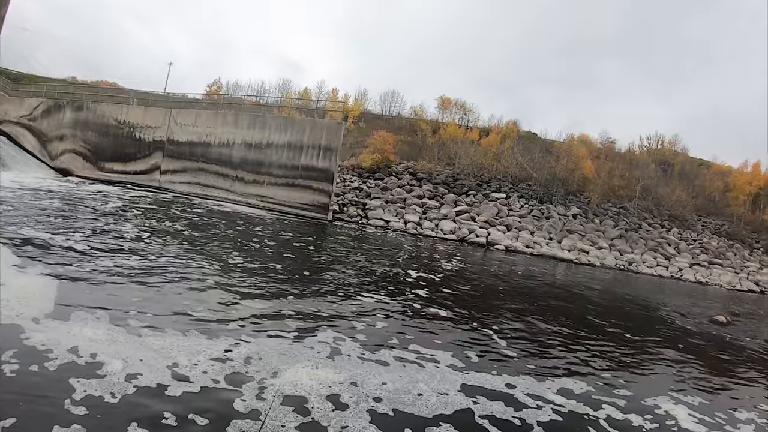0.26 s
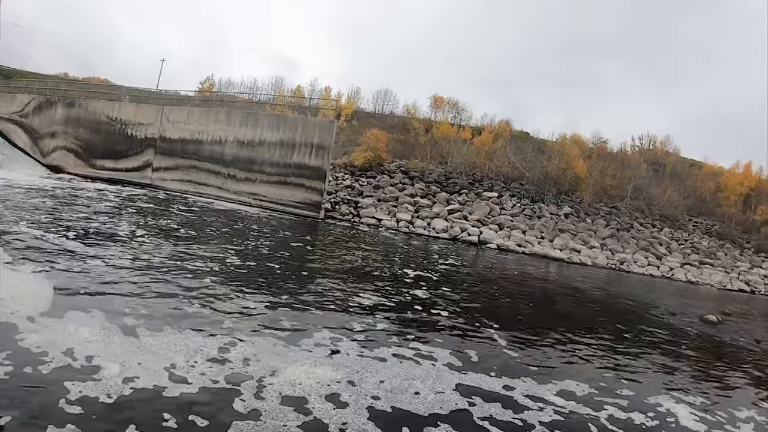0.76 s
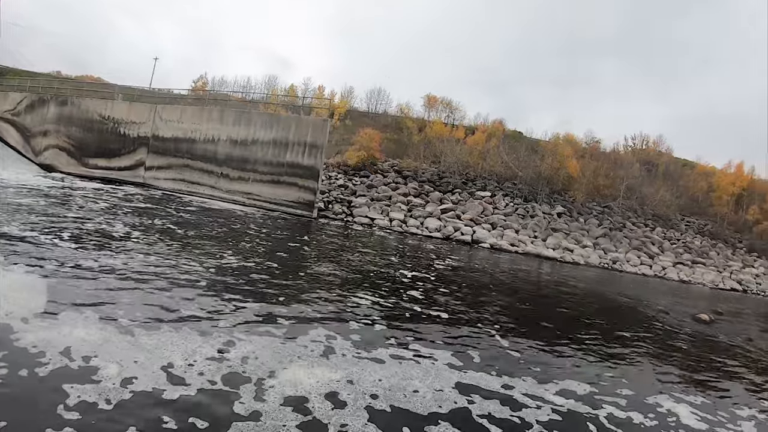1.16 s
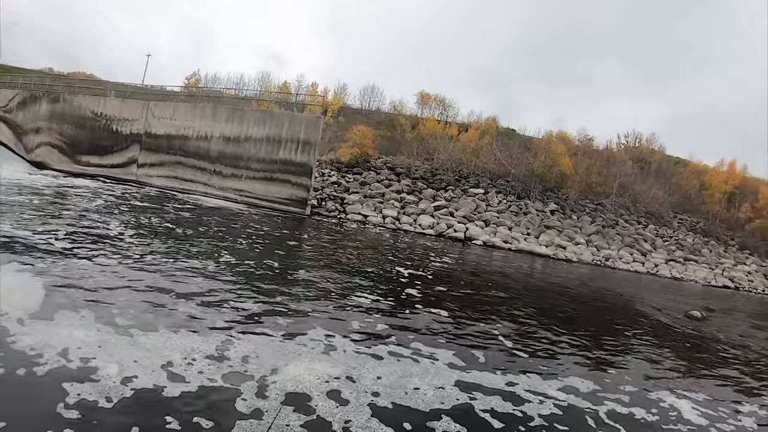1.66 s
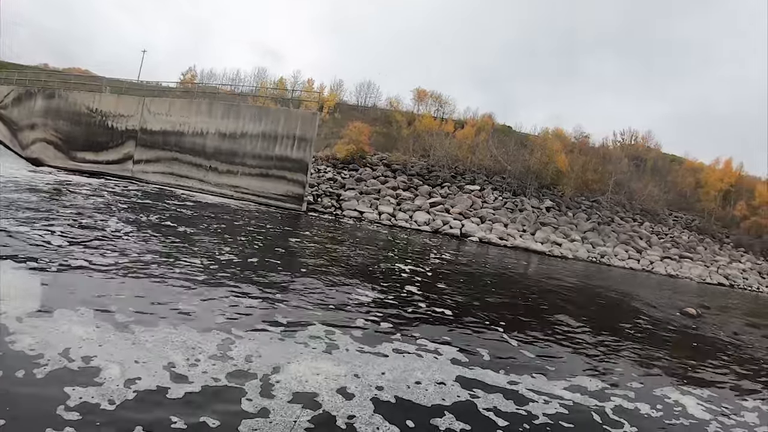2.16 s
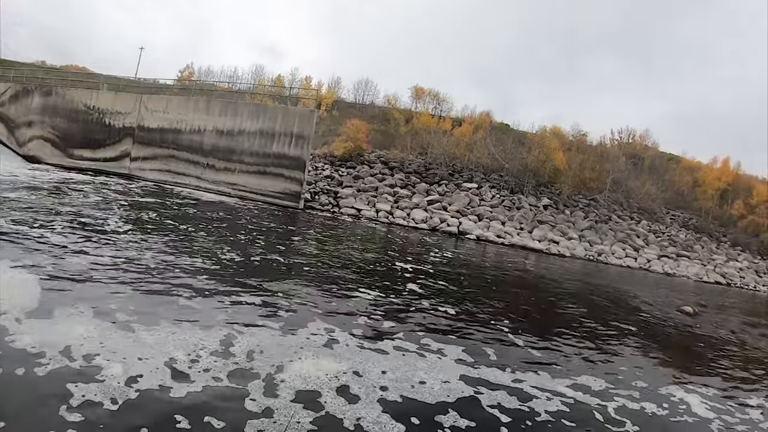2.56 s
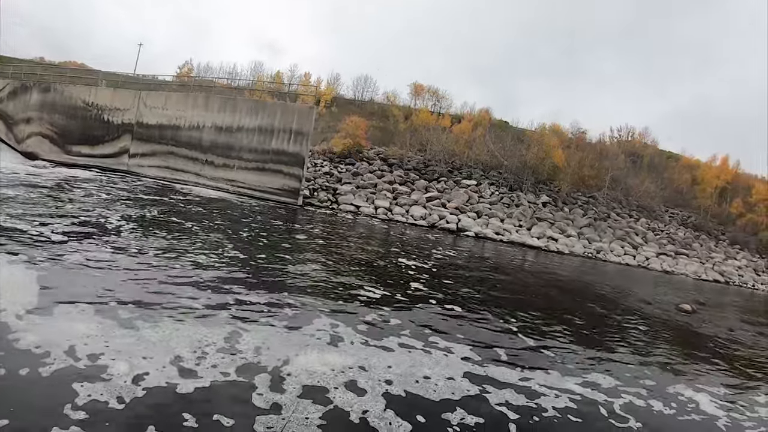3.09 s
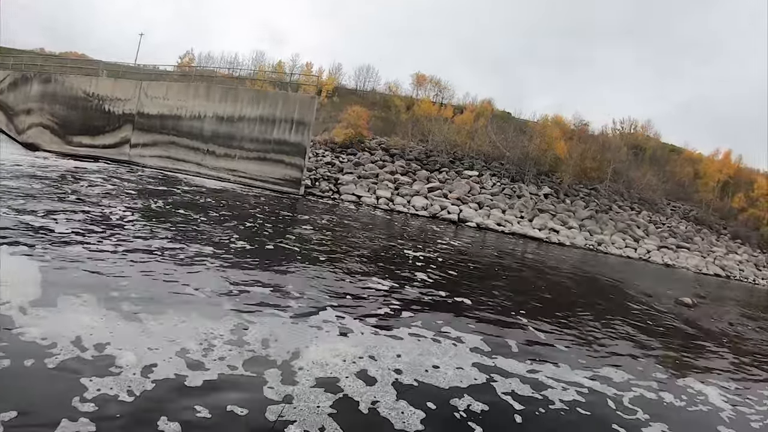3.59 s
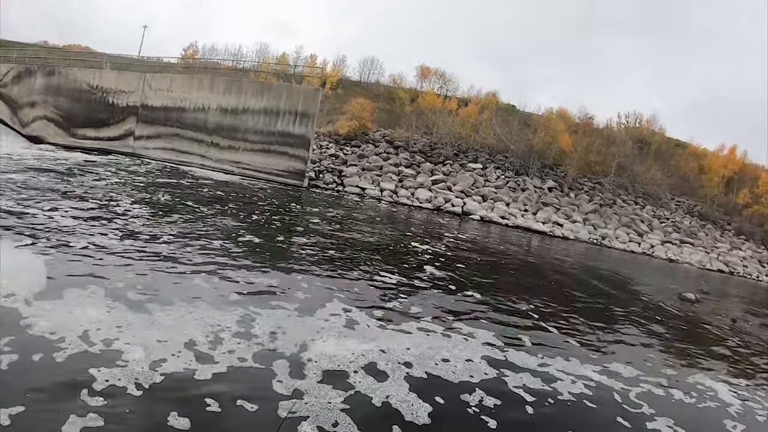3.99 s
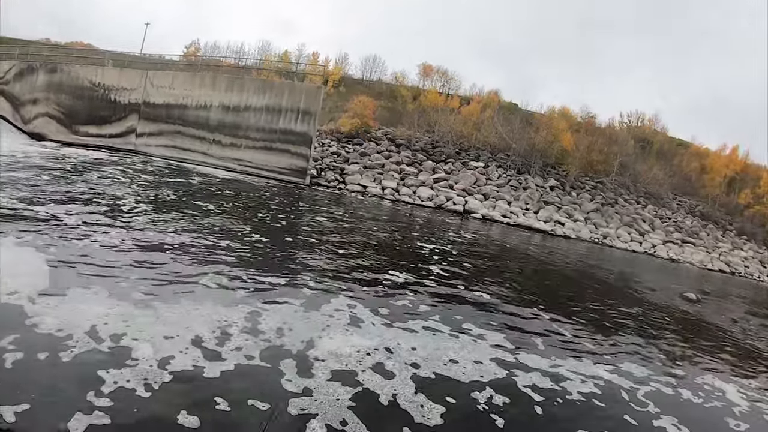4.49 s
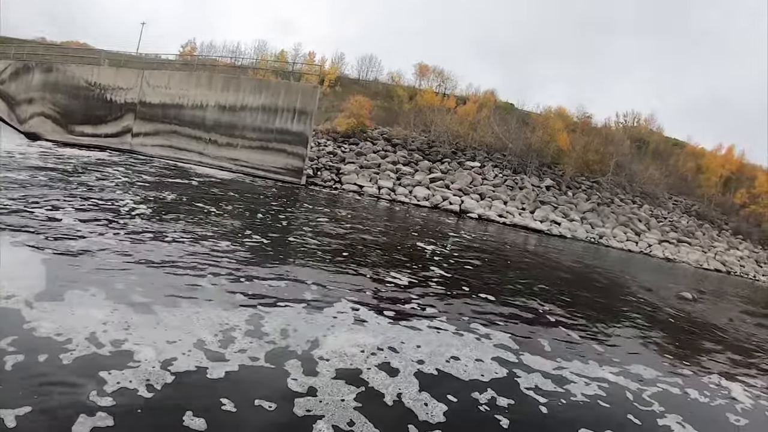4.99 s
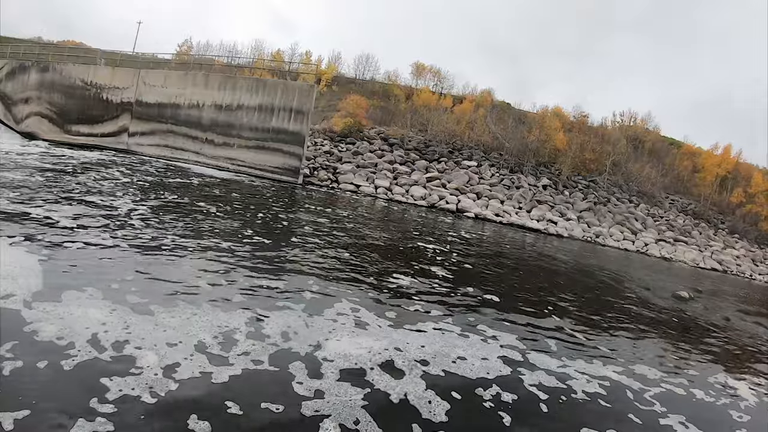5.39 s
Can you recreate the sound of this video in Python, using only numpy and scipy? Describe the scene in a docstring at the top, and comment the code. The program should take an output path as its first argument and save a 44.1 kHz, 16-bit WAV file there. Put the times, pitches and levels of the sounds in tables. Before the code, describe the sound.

Lumpy low wind rumble and flapping dominate outdoors, while smooth distant falling water hisses constantly behind, with a couple of tiny close plops.

```python
"""A wide pool below a concrete spillway, where wind blows unevenly over a small microphone in a closed housing.
The far fall is a smooth rush of shaped noise. Wind eddies of seven sizes, each a narrow band of noise,
range from rumble and thuds to flutter and rustle. Foam bubbles burst as faint, very short rings,
and four drops plop close by as short tones with rising pitch."""
import sys
import numpy as np
from scipy import signal
from scipy.fft import rfft, irfft, next_fast_len
from scipy.io import wavfile
from scipy.ndimage import uniform_filter1d, minimum_filter1d

SR = 44100
rng = np.random.default_rng(int(sys.argv[2]) if len(sys.argv) > 2 else 0)


def inscribe(sig):
    """Save sig as 16-bit PCM at rate SR to the path in sys.argv[1].

    A 1-D sig is mono; a 2-D sig holds one channel per row.
    Samples are clipped to [-1, 1] before scaling.
    """
    pcm = np.round(np.clip(np.atleast_2d(sig).T, -1, 1) * 32767)
    wavfile.write(sys.argv[1], SR, pcm.astype(np.int16))


N = 249165

# level and brightness of the fall's rush over time: start_s, rush_level_db, brightness_db_per_octave
FALL_OVER_TIME = [(0, -44, 0), (.35, -43, -0.5), (.48, -42.5, -0.5), (.65, -43, -0.7), (1.3, -43, -0.5),
                  (1.55, -44, 0), (2.2, -43.5, -0.1), (2.6, -45, 0), (2.8, -44.5, -0.3), (2.92, -45.5, 0.1),
                  (3.1, -45, 0), (3.4, -43.5, -0.4), (3.8, -43, 0.1), (4.05, -44, -0.4), (4.3, -43, 0.1),
                  (4.6, -43, -0.5), (5.05, -43, -0.3), (5.65, -43.5, -0.3)]
# colour of the rush: frequency_hz, relative_level_db (per Hz)
RUSH_COLOUR = [(300, -12.5), (450, -9.5), (700, -3.5), (1000, -8.5), (1300, -11.5), (1750, -11.5),
               (2200, -14), (3200, -19), (3600, -30), (4800, -31.5), (5300, -38.5), (7300, -39),
               (8800, -48.5), (9600, -51.5), (10500, -59)]
FALL_WAVER_DB, FALL_WAVER_RATE_HZ = .55, 6

# uneven level of the big slow eddies from moment to moment, before random lumps and puffs:
# start_s, rumble_db, thud_db, buffet_db
BIG_EDDY_LEVELS = [(0.0, -30.5, -41, -34), (0.09, -26.5, -33, -36.5), (0.12, -36.5, -34.5, -31),
                   (0.56, -31, -31, -27.5), (0.61, -41, -40, -25.5), (0.65, -25, -27, -26.5),
                   (0.76, -46, -23.5, -32), (0.83, -28, -45, -30.5), (0.92, -22.5, -32, -28.5),
                   (0.97, -24, -47, -29.5), (1.01, -32, -22, -24), (1.06, -34, -34, -36),
                   (1.18, -37, -30.5, -29.5), (1.23, -31, -30, -29), (1.4, -35, -34, -31),
                   (1.55, -35, -36, -34.5), (1.75, -36, -30.5, -33), (1.95, -37, -31, -34.5),
                   (2.03, -33, -33, -24), (2.07, -37, -27, -26), (2.21, -41, -37, -38),
                   (2.24, -29.5, -30, -32), (2.33, -31, -25, -26.5), (2.42, -31, -35, -32.5),
                   (2.51, -33, -32, -25), (2.56, -24.5, -37, -24), (2.7, -35, -27, -28),
                   (2.78, -27, -25, -22), (2.89, -34, -23, -23), (2.98, -33, -33.5, -30),
                   (3.01, -34.5, -30, -34), (3.15, -29, -34.5, -32), (3.27, -43, -31, -29.5),
                   (3.39, -31, -28, -28), (3.47, -41, -35, -36), (3.51, -31, -27, -26),
                   (3.57, -30, -31, -31), (3.67, -31, -22, -28), (3.77, -34, -28.5, -32),
                   (3.82, -25, -17.5, -26), (3.87, -30, -34, -30.5), (3.92, -33, -32, -19.5),
                   (3.96, -36, -44, -30), (4.04, -44, -35, -38), (4.07, -38, -44, -30.5),
                   (4.18, -38, -23, -25), (4.28, -39, -28, -28.5), (4.41, -33.5, -33, -29),
                   (4.54, -31, -25, -27), (4.68, -42, -31, -29.5), (4.8, -38, -32, -27.5),
                   (4.87, -32, -25, -31.5), (5.02, -29, -23, -33), (5.08, -35, -32.5, -30.5),
                   (5.26, -26.5, -20.5, -36), (5.3, -43, -38, -30), (5.44, -40, -37, -32.5),
                   (5.55, -32, -20.5, -39), (5.6, -31, -35, -26)]
# uneven level of the small fast eddies at the port, before random lumps and puffs:
# start_s, flap_db, flutter_db, rustle_db, whisk_db
SMALL_EDDY_LEVELS = [(0.0, -34.5, -26.5, -30, -38), (0.13, -31, -26.5, -34, -41),
                     (0.25, -32.5, -29.5, -34, -41), (0.44, -33.5, -29, -34, -41),
                     (0.52, -42, -32, -38, -32), (0.6, -28, -32, -38, -51), (0.64, -32, -40, -38.5, -46),
                     (0.69, -37, -35, -40, -50), (0.85, -35.5, -34, -38, -51),
                     (1.02, -32.5, -39, -38.5, -41.5), (1.26, -36.5, -31, -29, -44),
                     (1.3, -27.5, -31.5, -30, -41.5), (1.51, -28.5, -23.5, -32.5, -40.5),
                     (1.56, -20.5, -33.5, -38.5, -39.5), (1.67, -32.5, -27.5, -28, -39.5),
                     (1.74, -36, -26, -40.5, -39), (1.79, -27.5, -28.5, -34, -39.5),
                     (1.95, -27.5, -27, -31.5, -41), (2.12, -27.5, -26, -33, -42),
                     (2.16, -19.5, -28.5, -37, -41), (2.34, -37, -24, -31, -40.5),
                     (2.41, -26.5, -39, -29.5, -42.5), (2.67, -29.5, -28.5, -38, -41),
                     (2.69, -24, -30, -31, -35.5), (3.05, -33.5, -35.5, -41, -46.5),
                     (3.3, -33, -35.5, -38.5, -48.5), (3.47, -28, -36.5, -36, -43),
                     (3.51, -25.5, -24.5, -33, -41.5), (3.63, -28.5, -31.5, -40, -42.5),
                     (3.89, -26.5, -31, -33.5, -39.5), (3.98, -31.5, -36.5, -40.5, -49),
                     (4.19, -31, -34, -34, -41.5), (4.44, -28, -35, -43.5, -47),
                     (4.53, -44.5, -34, -36, -46), (4.66, -27, -29, -35, -41.5),
                     (4.77, -38, -26.5, -33.5, -40.5), (4.85, -27.5, -29, -35.5, -39.5),
                     (5.0, -23, -25.5, -29.5, -39.5), (5.1, -28.5, -26.5, -32.5, -39.5),
                     (5.25, -29, -27, -35.5, -43.5), (5.35, -29, -28, -31, -40), (5.45, -24, -31, -34, -43),
                     (5.62, -22.5, -26, -30.5, -42), (5.65, -20, -22, -28, -40)]
# colour of each eddy size, largest first: frequency_hz, relative_level_db (per Hz)
RUMBLE_COLOUR = [(8, -22), (15, -9), (25, -2.5), (34, -1), (42, -18)]
THUD_COLOUR = [(28, -18), (35, -2), (43, -1), (56, -3.5), (68, -18)]
BUFFET_COLOUR = [(52, -18), (63, -1), (80, -3), (108, -4.5), (135, -18)]
FLAP_COLOUR = [(80, -32), (115, -5), (155, 0.5), (195, -6.5), (260, -33.5)]
FLUTTER_COLOUR = [(165, -19.5), (205, -3), (245, 0), (285, -5), (330, -21)]
RUSTLE_COLOUR = [(270, -21.5), (312, 1.5), (345, -6), (390, -2), (440, -9), (500, -25)]
WHISK_COLOUR = [(410, -20.5), (460, 0.5), (530, 1), (600, -8), (800, -11.5), (1000, -20.5)]
# how steady each eddy size is, from rumble to whisk: evenness (0 to 1), lumps_db (either sign)
EDDY_STEADINESS = [(0.72, -1), (0.6, 3), (1, -0.66), (0.5, 0.5), (1, -0.5), (1, 0.6), (1, 0.4)]
EVEN_S, LUMP_RATE_HZ = 0.16, 13
# brief lifts or dips of all eddies at once: top_s, lift_db
PUFF_LIST = [(.1, 2), (.41, 0.5), (.5, -1), (.67, 4), (.86, 1.5), (1.03, -0.5), (1.5, -0.5), (2.25, 5.5),
             (3.1, 3.5), (3.5, 2), (4.98, -0.5), (5.24, 3.5)]
PUFF_ATTACK_S, PUFF_RELEASE_S = 0.025, 0.025

# bubbles in the foam: average count, lowest level at 1 kHz, scale of the random boost on top
SPECKS_PER_S, SPECK_DB, SPECK_SPREAD_DB = 70, -52, 2.5

# close drops before the housing: start_s, level_db, pitch_hz, swell_s,
# pitch_rise (half the share by which pitch rises per swell),
# overtone_db (relative to the main tone at the start)
CLOSE_DROPS = [(1.9783, -46, 3250, .0004, .02, -30), (2.0430, -31, 1150, .00085, .01, -20),
               (2.8422, -46, 2700, .0005, .13, -10), (4.6412, -27.5, 1160, .0009, .005, -3.5)]

# resonances and notches of the housing: frequency_hz, width_hz, gain_db
HOUSING_PEAKS = [(1750, 240, 0.5), (1930, 280, -4.5), (2584, 350, -3), (3620, 250, -1), (3775, 160, 6),
                 (4800, 230, -1.5), (5600, 200, 4.5), (5750, 200, -2), (6440, 330, 4)]

# peaks above this level are turned down, judged over this span
LIMIT_DB, LIMIT_LOOK_S = -11, 0.026
CUTOFF_HZ = 10450


def from_db(db):
    """Turn decibels into a plain multiplier."""
    return 10 ** (np.asarray(db) / 20)


def rms_one(x):
    """Scale a sound to an rms (average strength) of 1."""
    return x / np.sqrt(np.mean(x ** 2) + 1e-20)


def in_time(rows):
    """Join the table points by straight lines, giving each column one value per sample."""
    times, *columns = np.transpose(rows)
    return [np.interp(np.arange(N) / SR, times, column) for column in columns]


def drift(rate_hz):
    """Slow random wandering with spread 1: noise through two equal one-pole low-pass filters."""
    r = np.exp(-2 * np.pi * rate_hz / SR)
    noise = rng.standard_normal(N + SR)
    # the first second is dropped while the filter settles
    return rms_one(signal.lfilter([1], [1, -2 * r, r * r], noise)[SR:])


def coloured(colour):
    """White noise shaped to a colour table, falling 30 dB per octave beyond its ends; rms 1."""
    size = next_fast_len(N)
    hz = np.maximum(np.arange(size // 2 + 1) * SR / size, 1)
    point_hz, point_db = np.array(colour).T
    shape_db = np.interp(np.log(hz), np.log(point_hz), point_db)
    octaves_outside = np.log2(np.maximum(point_hz[0] / hz, hz / point_hz[-1]))
    shape_db -= 30 * np.maximum(0, octaves_outside)
    white = rfft(rng.standard_normal(size))
    return rms_one(irfft(white * from_db(shape_db), size)[:N])


def fall():
    """Countless far bubbles merge into smooth noise; its brightness tilts and each band wavers a little."""
    rush_db, tilt_db = in_time(FALL_OVER_TIME)
    spectrum = rfft(coloured(RUSH_COLOUR))
    hz = np.arange(N // 2 + 1) * SR / N
    edges_hz = [200, 1000, 1800, 3300, 6000, 12000]
    out = 0
    for low, high in zip(edges_hz[:-1], edges_hz[1:]):
        band = irfft(spectrum * (hz >= low) * (hz < high), N)
        # the tilt leaves the band ending at 3300 Hz alone
        band_db = tilt_db * np.log2(high / 3300) + FALL_WAVER_DB * drift(FALL_WAVER_RATE_HZ)
        out = out + band * from_db(band_db)
    return from_db(rush_db) * out


def eddies(colour, level_db, evenness):
    """Turbulent pressure of one eddy size; its own slow swells are evened out before the level is set."""
    noise = coloured(colour)
    span = int(EVEN_S * SR)
    power = uniform_filter1d(uniform_filter1d(noise ** 2, span), span)
    evened = noise / (power + 0.03) ** (np.clip(evenness, 0, 1) / 2)
    return from_db(level_db) * rms_one(evened)


def puffs():
    """Each puff lifts or dips the whole wind, growing towards its top and fading after it."""
    t = np.arange(N) / SR
    lift_db = 0
    for top_s, db in PUFF_LIST:
        swell = np.exp(np.minimum((t - top_s) / PUFF_ATTACK_S, (top_s - t) / PUFF_RELEASE_S))
        lift_db = lift_db + db * swell
    return from_db(lift_db)


def wind():
    """Seven eddy sizes add up, each with its own uneven level and random lumps."""
    colours = [RUMBLE_COLOUR, THUD_COLOUR, BUFFET_COLOUR, FLAP_COLOUR,
               FLUTTER_COLOUR, RUSTLE_COLOUR, WHISK_COLOUR]
    levels_db = in_time(BIG_EDDY_LEVELS) + in_time(SMALL_EDDY_LEVELS)
    out = 0
    for colour, level_db, (evenness, lumps_db) in zip(colours, levels_db, EDDY_STEADINESS):
        lumpy_db = level_db + lumps_db * drift(LUMP_RATE_HZ)
        out = out + eddies(colour, lumpy_db, evenness)
    return out * puffs()


def foam():
    """Bubbles burst at random; each rings and dies within a few cycles, fainter towards the treble."""
    bursts = rng.random(N) < SPECKS_PER_S / SR
    boost = rng.exponential(1, N).clip(0, 3)
    born = bursts * from_db(SPECK_DB + SPECK_SPREAD_DB * boost)
    pitch_number = rng.integers(0, 12, N)
    out = 0
    for k, hz in enumerate(np.geomspace(800, 4500, 12)):
        r, w = np.exp(-hz / SR), 2 * np.pi * hz / SR
        # the tiny constant keeps the filter away from extremely small numbers
        starts = born * (pitch_number == k) + 1e-18
        ring = signal.lfilter([0, np.sin(w)], [1, -2 * r * np.cos(w), r * r], starts)
        out = out + 1000 / hz * ring
    return out


def close_water():
    """Each drop traps a bubble that swells in, rings a few cycles with rising pitch and dies."""
    out = np.zeros(N)
    for start_s, level_db, hz, swell_s, rise, overtone_db in CLOSE_DROPS:
        t = np.arange(int(10 * swell_s * SR)) / SR
        shape = np.e * t / swell_s * np.exp(-t / swell_s)
        turns = hz * t * (1 + rise * t / swell_s)
        # the overtone dies sooner than the main tone
        overtone_gain = from_db(overtone_db) * np.exp(-t / swell_s / 2)
        tone = np.sin(2 * np.pi * turns) + overtone_gain * np.sin(2 * np.pi * 1.75 * turns)
        first = round(start_s * SR)
        out[first:first + len(t)] += from_db(level_db) * shape * tone
    return out


def housing(x):
    """The shell and its port boost or weaken narrow bands: one peaking filter for each."""
    for hz, width, gain_db in HOUSING_PEAKS:
        a, w = from_db(gain_db / 2), 2 * np.pi * hz / SR
        k = np.pi * width / SR
        top = [1 + k * a, -2 * np.cos(w), 1 - k * a]
        bottom = [1 + k / a, -2 * np.cos(w), 1 - k / a]
        x = signal.lfilter(top, bottom, x)
    return x


def scene():
    """Water sounds pass through the housing; wind acts on the microphone directly."""
    water = fall() + foam() + close_water()
    return (housing(water) + wind())[None]


def record(dry):
    """A limiter eases the gain down around the strongest peaks; then the treble is cut."""
    span = int(LIMIT_LOOK_S * SR)
    # the square root takes off only half of the excess in dB
    gain = np.minimum(1, from_db(LIMIT_DB) / (np.abs(dry) + 1e-9)) ** .5
    lowest = minimum_filter1d(gain, 2 * span)
    limited = dry * uniform_filter1d(uniform_filter1d(lowest, span), span)
    treble_cut = signal.ellip(10, .5, 60, CUTOFF_HZ, fs=SR, output="sos")
    return signal.sosfilt(treble_cut, limited)


dry = scene()
out = record(dry)
inscribe(out)
```